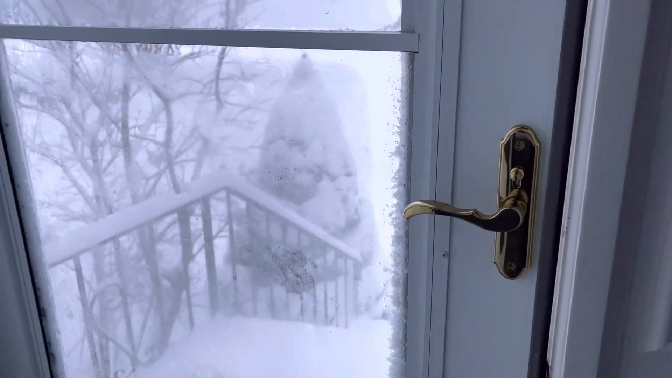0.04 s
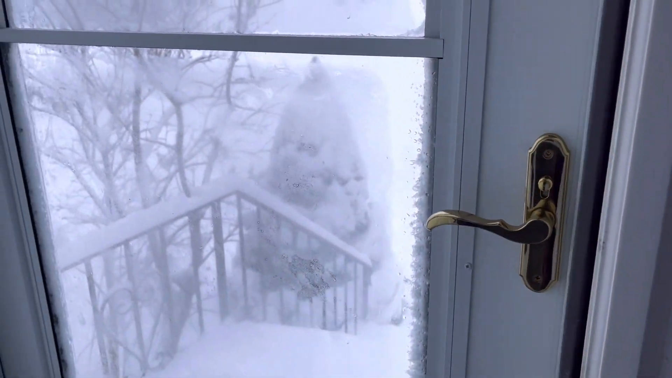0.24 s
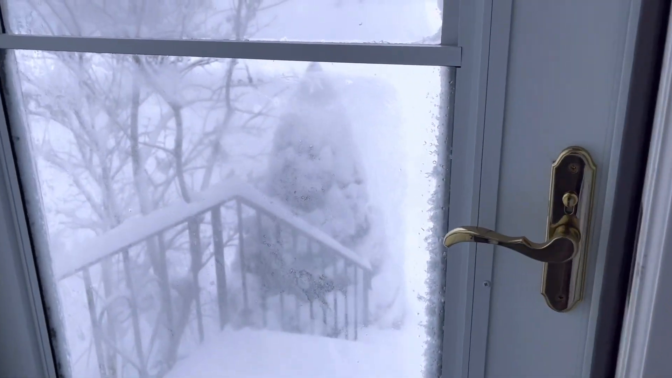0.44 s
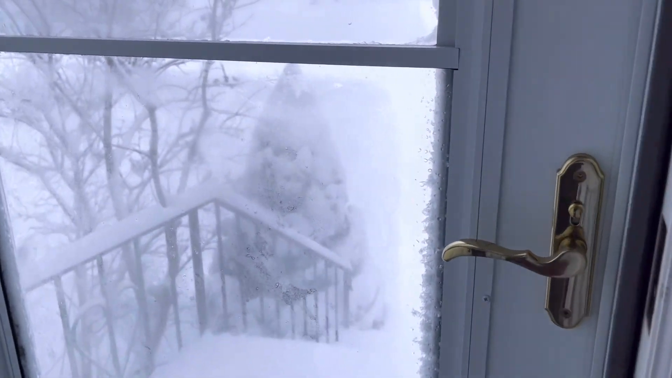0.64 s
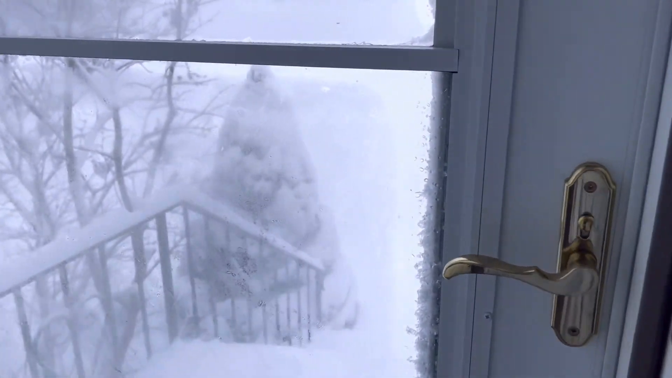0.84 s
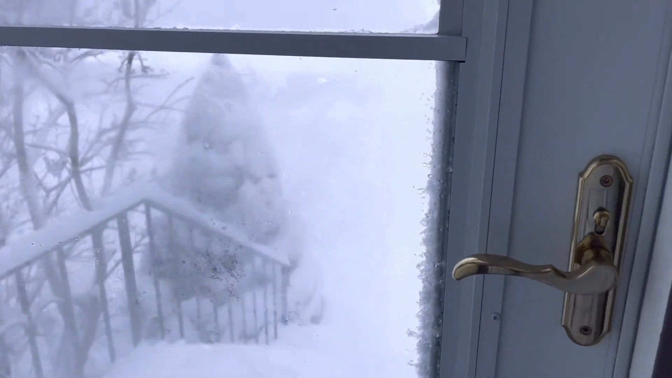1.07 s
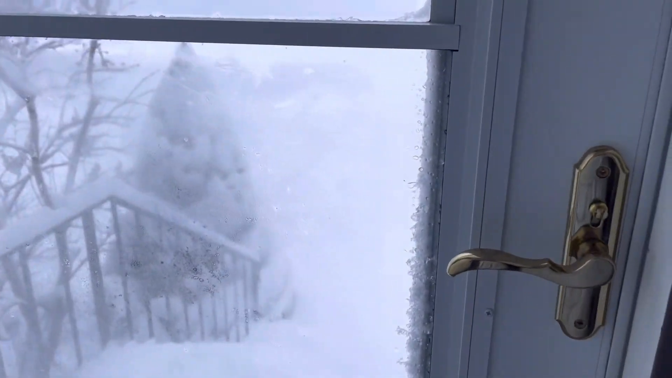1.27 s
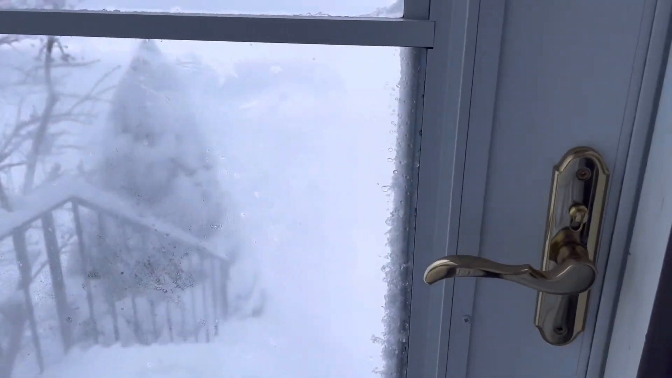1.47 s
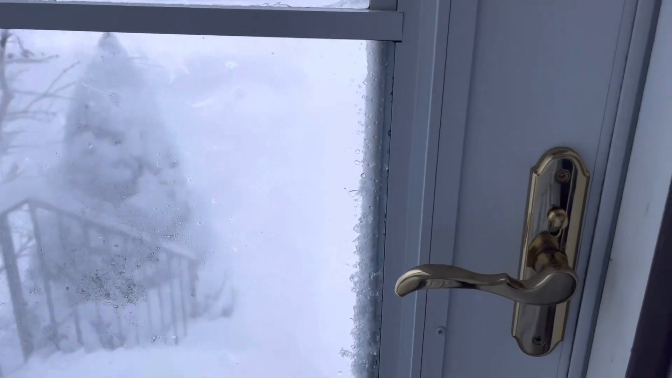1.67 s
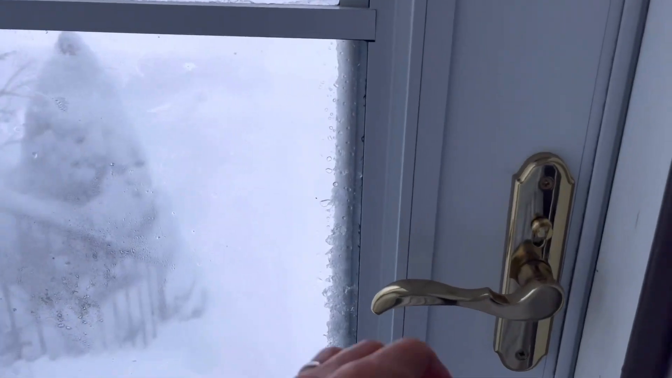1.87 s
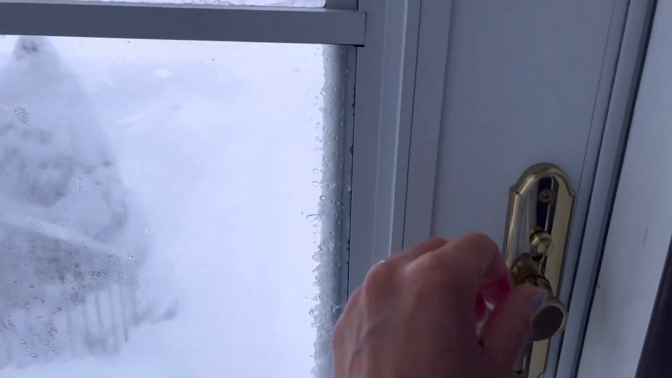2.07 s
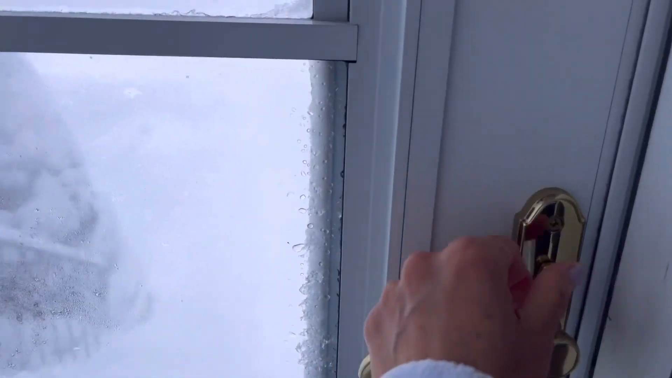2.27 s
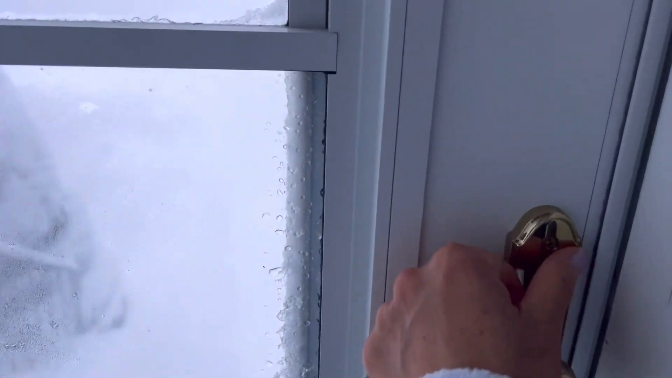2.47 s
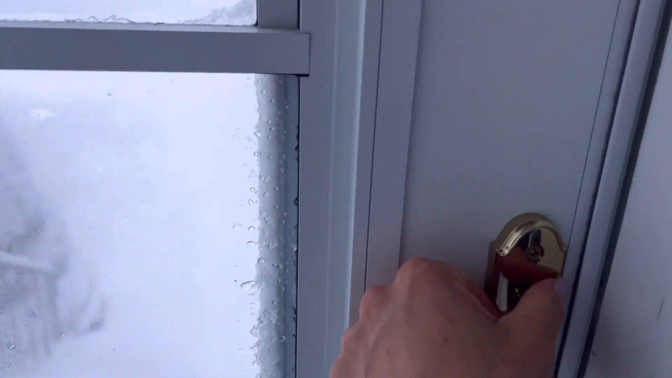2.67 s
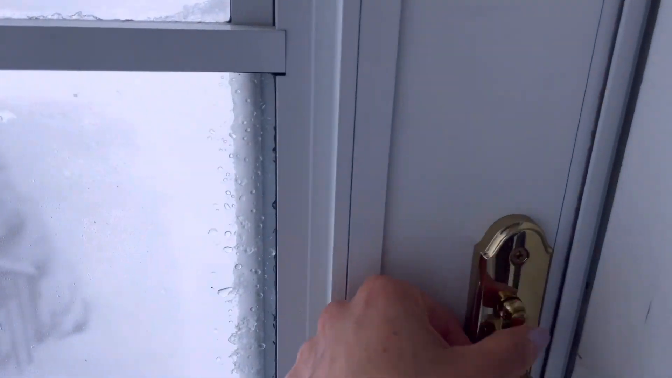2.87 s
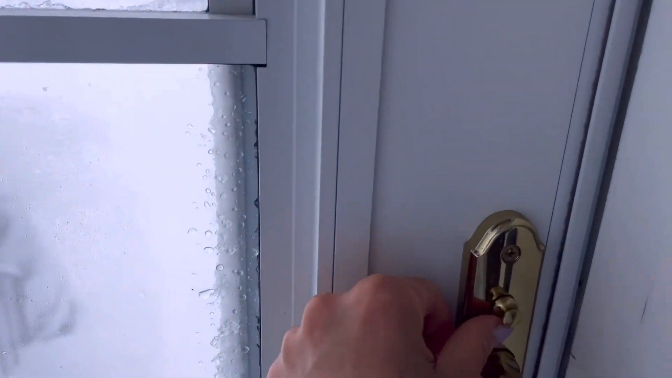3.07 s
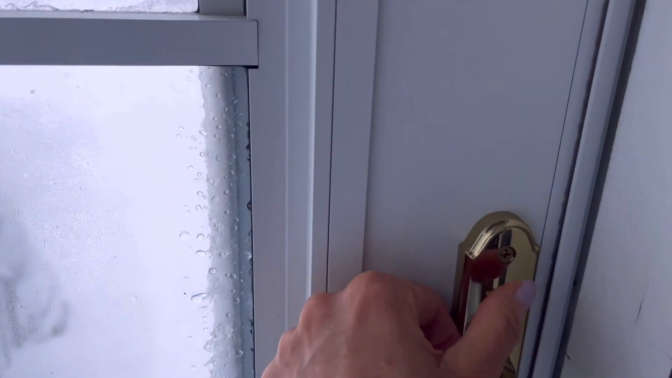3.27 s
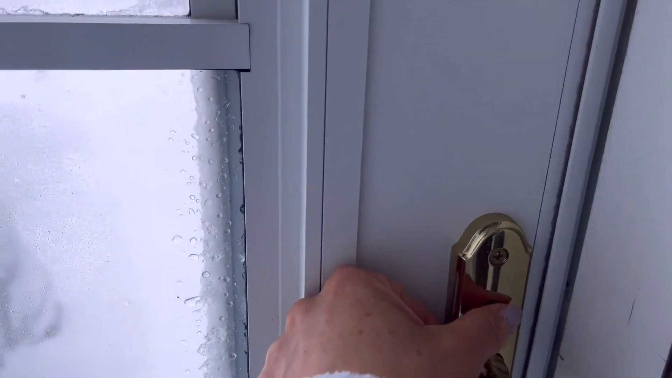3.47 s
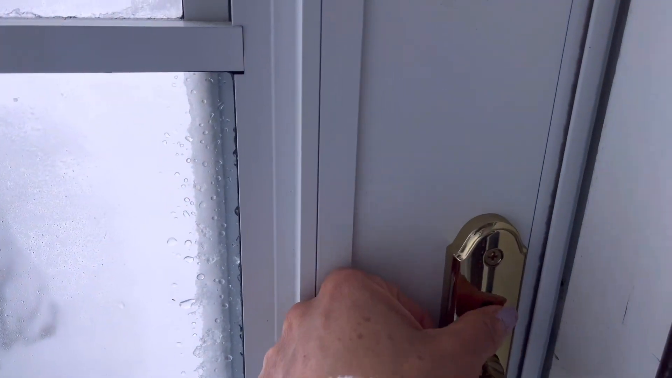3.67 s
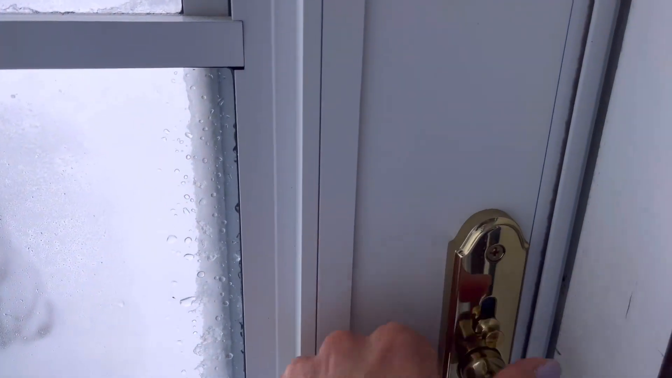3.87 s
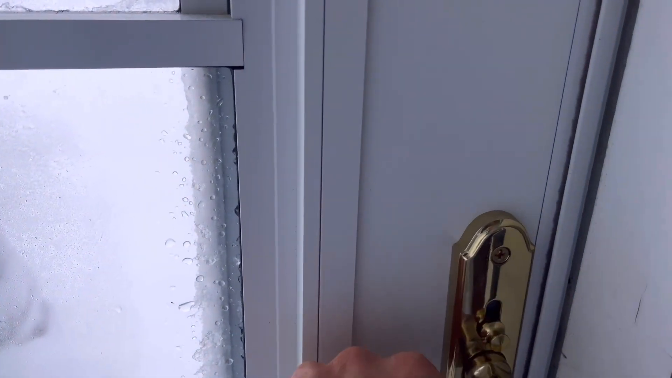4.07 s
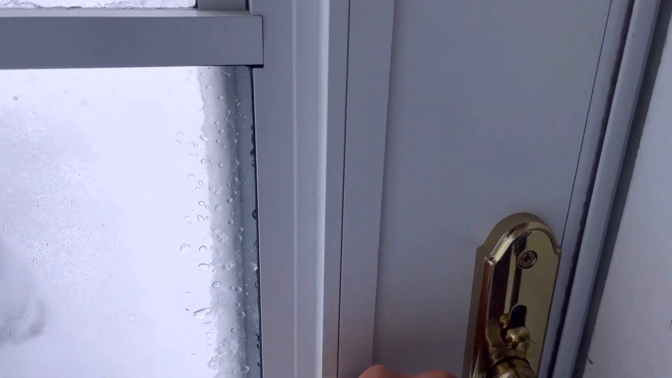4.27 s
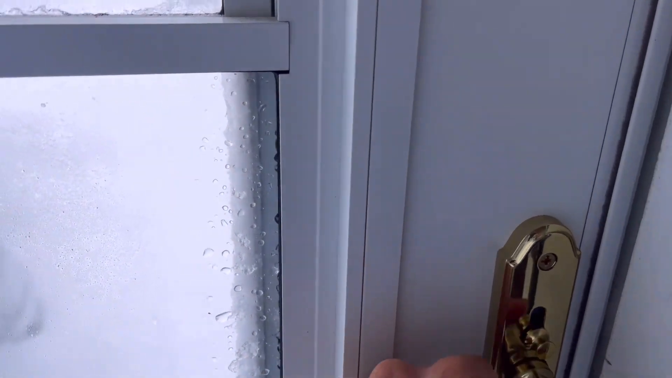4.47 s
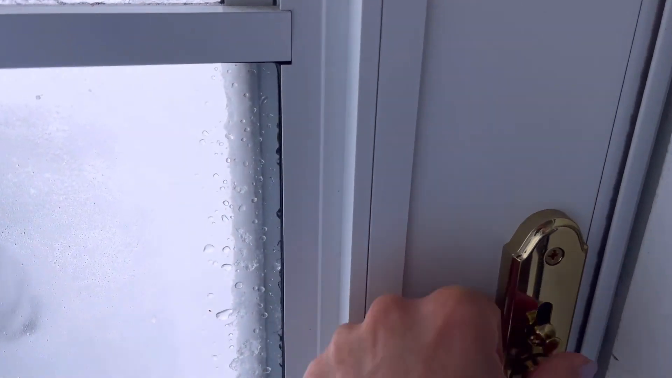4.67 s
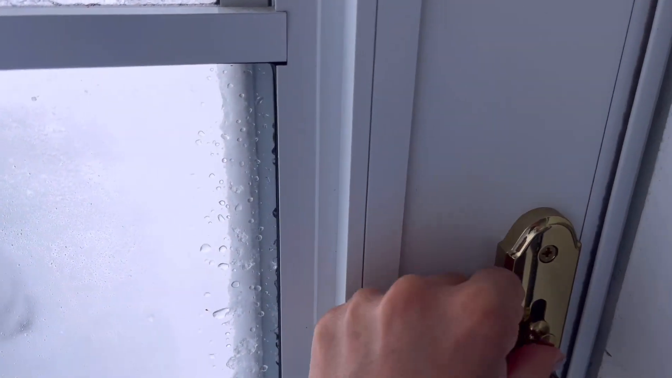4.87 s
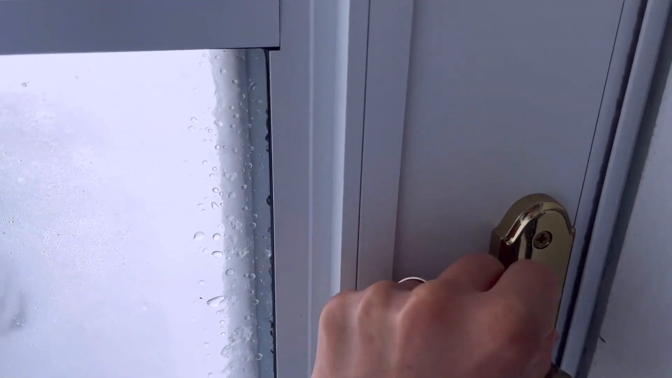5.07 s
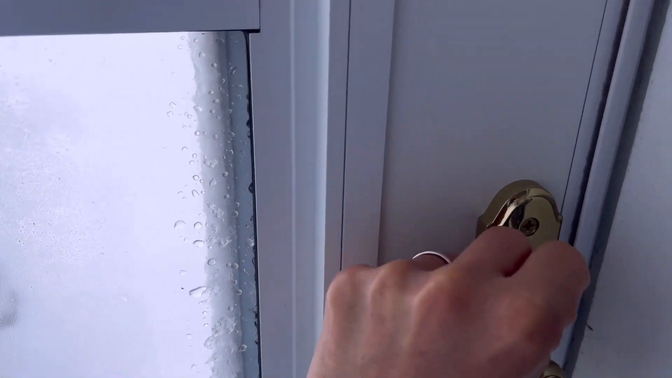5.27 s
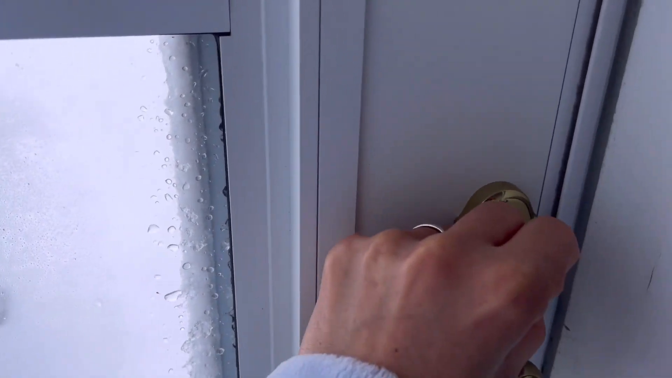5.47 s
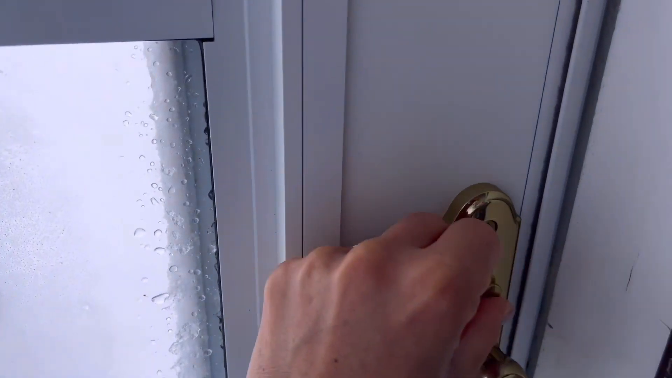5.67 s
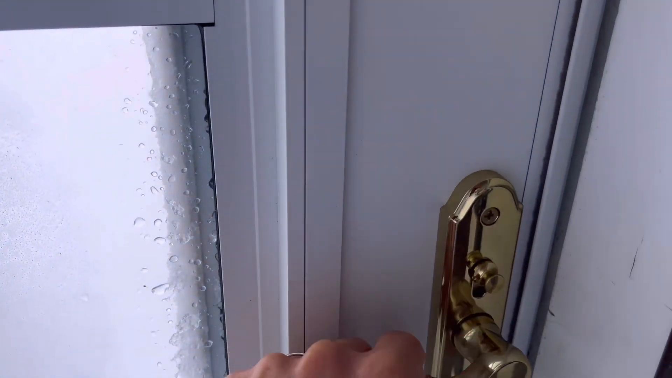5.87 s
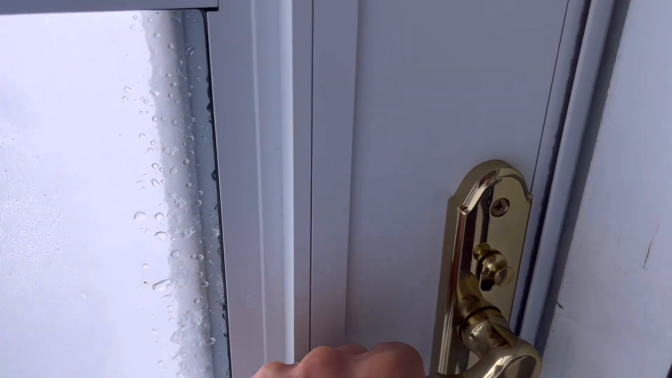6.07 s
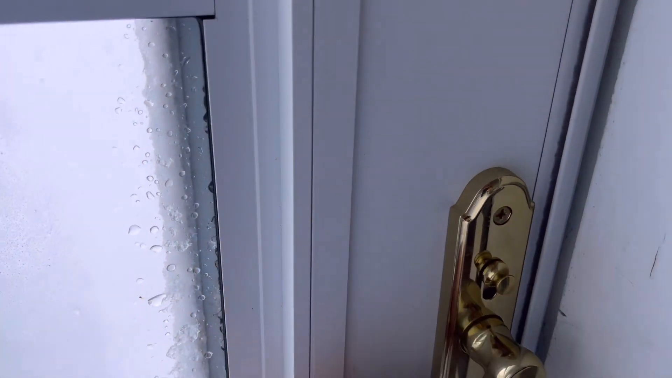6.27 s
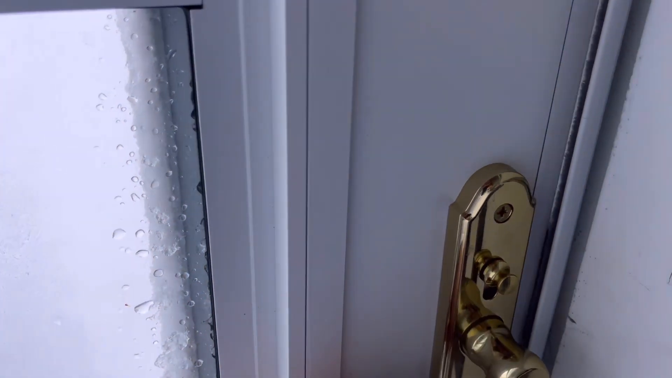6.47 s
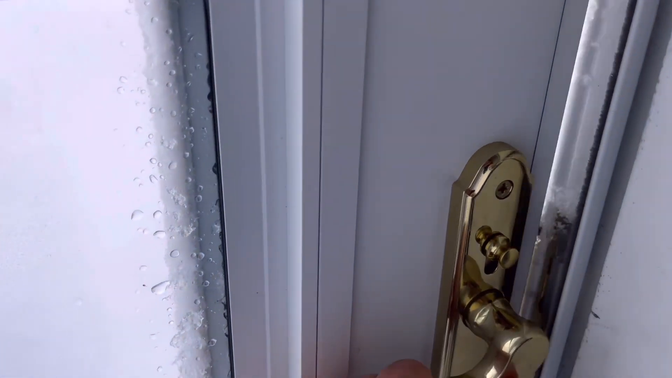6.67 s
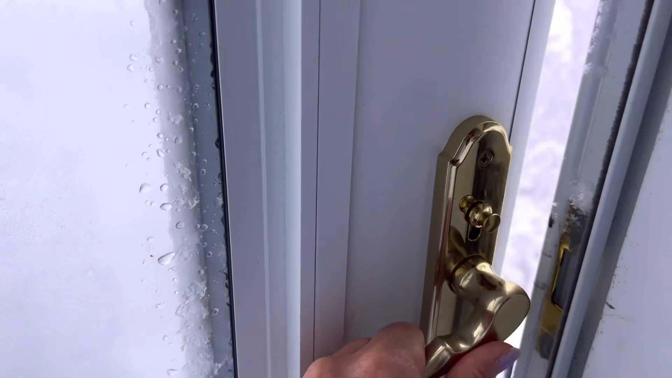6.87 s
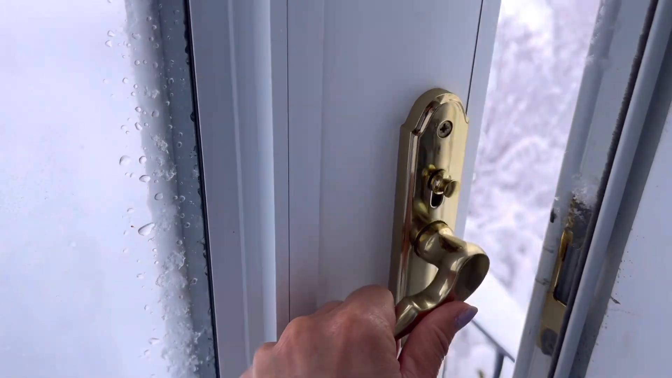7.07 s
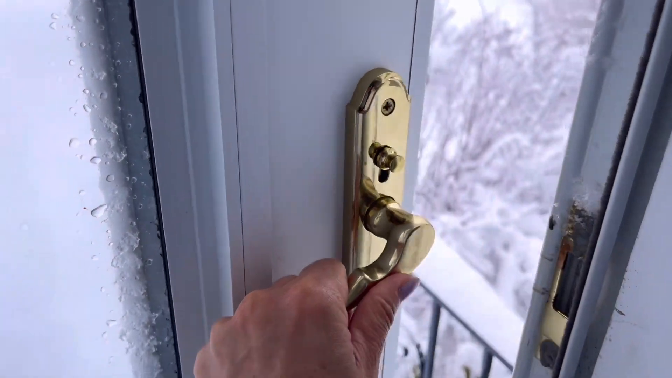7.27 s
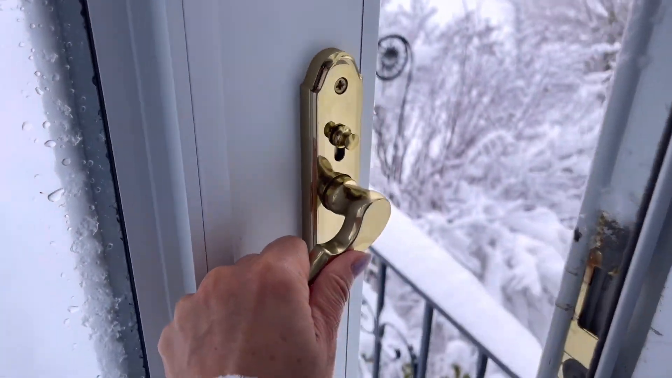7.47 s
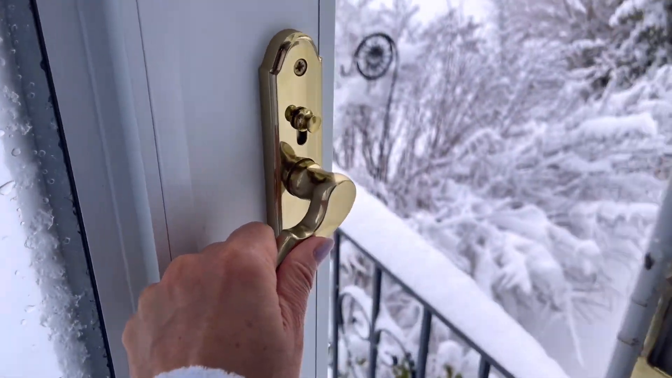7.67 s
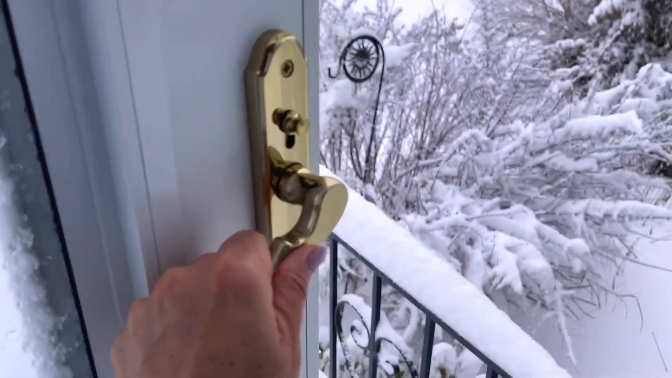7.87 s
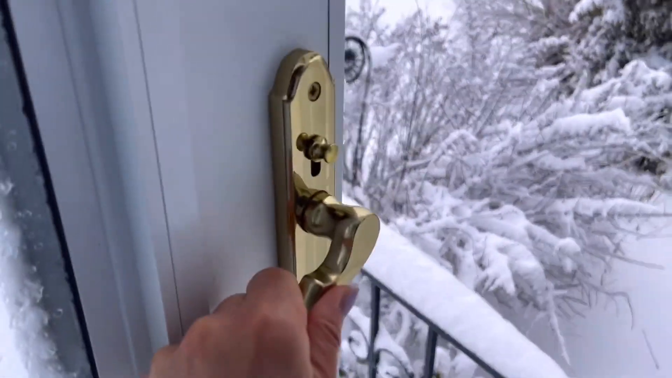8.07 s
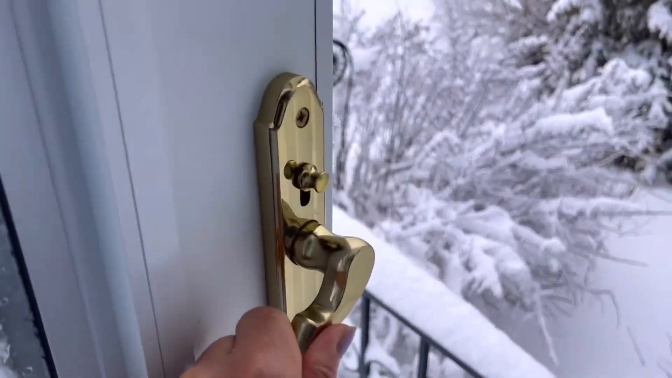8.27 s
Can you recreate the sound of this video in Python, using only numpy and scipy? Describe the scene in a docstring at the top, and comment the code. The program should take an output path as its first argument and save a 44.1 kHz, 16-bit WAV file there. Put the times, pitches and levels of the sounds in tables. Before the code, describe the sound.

Soft fabric rustle and light metal ticks begin, recorded very near the lock indoors. The bolt slams over twice about two seconds apart, with a thin faint squeak between. After a pause comes a short metallic grind, a dull heavy knock, a scrape and a thud as the door releases, then quiet hinge rubbing and light clicks. Low handling rumble and a short hallway echo surround it.

```python
"""In a hallway, close to the brass lock of a glazed metal storm door: a sleeve brushes by under a soft hiss.
The deadbolt snaps over twice, with small ticks of the thumb turn and one thin squeak between.
Then the lever grinds down, the latch knocks free, and the door scrapes off its frame and swings open.
Blows on lock and door are struck damped modes and noise; brushes, latch and frame are filtered tiny slips.
The microphone also takes in handling rumble, still air and the hallway's diffuse answer."""
import sys
import numpy as np
from scipy import signal
from scipy.fft import rfft, irfft, next_fast_len
from scipy.io import wavfile
from scipy.ndimage import uniform_filter1d, map_coordinates

SR = 44100
rng = np.random.default_rng(int(sys.argv[2]) if len(sys.argv) > 2 else 0)


def store_wav(level_fs):
    """Save 16-bit WAV to argv[1]."""
    pcm = np.round(np.clip(np.atleast_2d(level_fs), -1, 1) * 32767)
    wavfile.write(sys.argv[1], SR, pcm.T.astype(np.int16))


N = 367352
TIME = np.arange(N) / SR  # (s)
AGE = TIME[:SR // 2]  # time since a sound began (s)


def amp(db):
    """Decibels to gain."""
    return 10 ** (np.asarray(db) / 20)


def unit(x):
    """x at rms 1."""
    return x / np.sqrt(np.mean(x ** 2) + 1e-20)


def unit_blow(x, size=882):
    """A blow with the energy of size samples at rms 1."""
    return x / np.sqrt(np.sum(x ** 2) / size + 1e-20)


def along(points, hz):
    """Read (frequency_hz, value) points on a log frequency axis."""
    f, v = np.transpose(points)
    return np.interp(np.log(hz + 1), np.log(f + 1), v)


def level(rows):
    """Gain per sample from (time_s, level_db) rows, -120 dB outside them."""
    return amp(np.interp(TIME, *np.transpose(rows), left=-120, right=-120))


def wobble(rate):
    """A smooth random curve, rate knots a second."""
    knots = rng.standard_normal(int(N * rate / SR) + 4)
    return map_coordinates(knots, [TIME * rate])


def filtered(x, response):
    """x times a response of frequency."""
    m = next_fast_len(N + SR // 2)
    return irfft(rfft(x, m) * response(np.fft.rfftfreq(m, 1 / SR)), m)[:N]


def coloured(x, spectrum):
    """x through a (frequency_hz, level_db) spectrum, at rms 1."""
    return unit(filtered(x, lambda hz: amp(along(spectrum, hz))))


def slips(rate, spread_db):
    """Tiny impulses of uneven size at random moments, on average rate a second, at rms 1."""
    happens = rng.random(N) < rate / SR
    sign = rng.choice([-1, 1], N)
    size = amp(spread_db * np.minimum(rng.standard_normal(N), 2))
    return unit(happens * sign * size)


def add(track, s, sound):
    """Mix a sound into a track at time s."""
    start = max(round(s * SR), 0)
    track[start:start + len(sound)] += sound[:max(N - start, 0)]


def ringing(modes, scatter_db, length=1):
    """Damped modes, each struck at a new strength and sign."""
    hz, db, t60 = np.transpose(modes)[:, :, None]
    size = amp(db + scatter_db * rng.standard_normal(db.shape)) * rng.choice([-1, 1], db.shape)
    decay = np.exp(-np.log(1000) * AGE / (t60 * length))
    return np.sum(size * decay * np.sin(2 * np.pi * hz * AGE), axis=0)


def resonant(x, modes):
    """x through (frequency_hz, width_hz, level_db) resonances of alternating sign, at rms 1."""
    def response(f):
        total = 0
        for k, (centre, width, db) in enumerate(modes):
            damping = 1j * f * width
            total = total + (-1) ** k * amp(db) * damping / (centre ** 2 - f * f + damping)
        return total
    return unit(filtered(x, response))


def patchy(x, depth_db, size):
    """x with a colour that drifts from patch to patch; size = (bins, frames) of the smoothing."""
    z = signal.stft(x, nperseg=512)[2]
    field = rng.standard_normal(z.shape)
    for axis in (0, 1, 0, 1):
        field = uniform_filter1d(field, size[axis], axis)
    return signal.istft(z * amp(depth_db * unit(field)), nperseg=512)[1][:N]


# low modes of the door leaf: frequency_hz, relative level_db, full ring t60_s
LEAF_MODES = [(64, -10.5, 0.43), (75.5, -0.5, 0.34), (95.4, 3, 0.2), (120, -1, .28), (154.5, 1, .22),
              (183, -2, 0.28), (240, -4.5, 0.24), (299.5, -6.5, 0.21)]
# colour of the handling rumble: frequency_hz, relative level_db
RUMBLE_COLOUR = [(15, -50), (25, -24.5), (50, -1.5), (71, 6), (114, -6.5), (179, -6.5), (208, -10),
                 (288, -8.5), (327, -16), (500, -18.5), (650, -41.5), (1100, -120)]
# swell of the handling rumble before lumps and mix: time_s, level_db
HANDLING_SWELL = [(0.0, -66), (2.25, -62.5), (2.6, -62), (3.16, -53.5), (4.04, -67.5), (4.85, -55.5),
                  (5.75, -62.5), (6.15, -62), (6.31, -48.5), (6.61, -43), (7.03, -69), (7.63, -56.5),
                  (7.82, -46), (8.33, -67.5)]
# colour of the still air: frequency_hz, relative level_db
AIR_COLOUR = [(59, -30.5), (100, -6.5), (190, -3.5), (250, -18), (800, -30), (1800, -29), (3000, -34.5),
              (6000, -37), (8800, -42), (10900, -40), (16000, -50)]


def background():
    """Lumpy handling rumble, partly ringing in the door leaf, over the still air of the house."""
    # a mode's width follows from its ring
    widths = [(hz, np.log(1000) / (np.pi * t60), db) for hz, db, t60 in LEAF_MODES]
    leaf = resonant(rng.standard_normal(N), widths)
    rumble = amp(-3.5) * coloured(rng.standard_normal(N), RUMBLE_COLOUR) + amp(-5) * leaf
    lumps = amp(2.2 * wobble(14))
    air = amp(-66) * coloured(rng.standard_normal(N), AIR_COLOUR)
    return lumps * level(HANDLING_SWELL) * rumble + air


# short brushes of noise, some leading into a click: centre_s, level_db, half_width_s, bright_share (0-1)
BRUSH_STROKES = [(.06, -55.5, 0.0081, 0.27), (.96, -59.5, .024, 0.54), (1.071, -53, 0.018, 0.05),
                 (1.154, -49, .017, 0.14), (1.494, -45.5, 0.033, 0), (1.737, -48, 0.011, .01),
                 (1.844, -51, 0.018, 0), (2.05, -39.5, .026, 0.16), (2.17, -60.5, 0.053, 0),
                 (3.008, -54.5, .008, 0), (4.68, -65.5, 0.097, 0), (4.93, -68.5, 0.086, 0.2),
                 (5.029, -58, 0.0039, 0.34), (5.312, -54.5, 0.0054, 0.43), (6.934, -62.5, 0.028, 0.6),
                 (7.097, -51.5, 0.019, 0.21), (7.212, -48.5, 0.019, 0.04), (7.283, -42, 0.009, 0.35),
                 (8.15, -61, 0.0099, 0.13)]
# dull side of a brush: frequency_hz, relative level_db
DULL_COLOUR = [(88, 0), (150, -4.5), (348, -18.5), (524, -7.5), (662, -16), (790, -9), (1940, -9.5),
               (2450, -9.5), (5050, -13), (10600, -29.5), (16000, -45)]
# bright side of a brush: frequency_hz, relative level_db
BRIGHT_COLOUR = [(2000, -21), (6000, 9), (11000, 8), (16000, -9)]
# colour of the soft hiss: frequency_hz, relative level_db
HISS_COLOUR = [(120, -64), (200, -6), (283, -2), (322, -11.5), (360, -1.5), (387, -11.5), (448, 2.5),
               (538, -7), (709, 1), (933, -5), (2910, -6), (6280, -12), (16000, -41.5)]
# swell of the soft hiss of the opening seconds, before HISS_GAIN_DB: time_s, level_db
HISS_SWELL = [(0.0, -62), (0.16, -58.5), (0.36, -63.5), (1.05, -61.5), (1.26, -66), (1.49, -71),
              (1.61, -58), (1.99, -61.5), (2.53, -69.5), (2.79, -67), (2.91, -64), (3.45, -68)]
HISS_GAIN_DB = 1.5


def brushes_and_hiss():
    """Dense tiny slips swell into short brushes, over a soft noise hiss; the colour of both shifts."""
    dull = coloured(slips(rate=5000, spread_db=3), DULL_COLOUR)
    brightest = coloured(slips(rate=3900, spread_db=3), BRIGHT_COLOUR)
    brushes = np.zeros(N)
    for s, db, width, bright in BRUSH_STROKES:
        stroke = np.exp(-.5 * ((TIME - s) / width) ** 2)
        brushes += amp(db) * stroke * ((1 - bright) * dull + bright * brightest)
    hiss = level(HISS_SWELL) * coloured(rng.standard_normal(N), HISS_COLOUR)
    unsteady = amp(HISS_GAIN_DB + .6 * wobble(14)) * hiss
    return patchy(brushes + unsteady, depth_db=2, size=(11, 23))


# brief squeaks: start_s, level_db, swell_s, start_hz, end_hz, roughness_hz
SQUEAK_GLIDES = [(.002, -51, 0.0075, 1244, 1250, 40), (0.046, -52, 0.008, 1220, 1265, 50),
                 (0.049, -53, 0.0091, 2470, 2450, 40), (3.402, -64, 0.0076, 9500, 9600, 80),
                 (4.086, -56, 0.0066, 6090, 7980, 396), (6.289, -38, 0.004, 1940, 2170, 59),
                 (7.869, -32, 0.0028, 6220, 6150, 504)]


def squeaks():
    """Thin, unsteady tones that glide quickly and settle."""
    out = np.zeros(N)
    for s, db, swell_s, start_hz, end_hz, rough_hz in SQUEAK_GLIDES:
        glide = (end_hz - start_hz) * np.tanh(AGE / 0.022)
        pitch = start_hz + glide + rough_hz * wobble(700)[:len(AGE)]
        swell = AGE / swell_s * np.exp(1 - AGE / swell_s)  # peaks swell_s after the start
        add(out, s, amp(db) * swell * np.sin(2 * np.pi * np.cumsum(pitch) / SR))
    return out


# ranges in which the lock rings: low_hz, high_hz
RING_RANGES = [(250, 720), (820, 1400), (1400, 2600), (2600, 5500), (5500, 9500), (9500, 14500)]
# full ring of each range, high ranges die first: t60_s
RING_T60 = [0.1, .075, 0.086, 0.081, 0.056, .032]
# modes of the brass lock case: frequency_hz, relative level_db, full ring t60_s
CASE_MODES = [(377, -3, .14), (494, -2, .15), (650, -5, .1), (970, -1, .11), (1065, -1, .1),
              (1270, -2, .09), (1420, -3, .07), (1625, -2, .08), (1930, -4, .07), (2256, -3, .06),
              (2480, -3, .06), (2880, -2, .055), (3020, -3, .05), (3230, -2, .05), (3570, 0, .055),
              (3740, 1, .055), (3900, -1, .055), (4280, -3, .05), (4465, -4, .05), (5025, -4, .05),
              (5600, -6, .04), (7400, -4, .035), (8540, -3, .035), (10400, -3, .03), (12800, -6, .03)]


def contact(range_db, length, modes_db, crack_db, crack_s, rise):
    """Metal on metal: a crack, the dense ring of small parts and the case's modes."""
    seating = 1 - np.exp(-(AGE / rise) ** 4)  # the faces take a moment to meet fully
    case = seating * ringing(CASE_MODES, scatter_db=2.5, length=length)
    crack = amp(crack_db) * np.exp(-np.abs(AGE - rise) / crack_s)
    blow = np.zeros(len(AGE))
    for edges, t60, db in zip(RING_RANGES, RING_T60, range_db):
        band = signal.butter(4, edges, "bandpass", fs=SR, output="sos")
        fade = seating * (np.exp(-np.log(1000) * AGE / (t60 * length)) + crack)
        parts = unit_blow(signal.sosfilt(band, fade * rng.standard_normal(len(AGE))))
        modes = unit_blow(signal.sosfilt(band, case))
        blow += amp(db) * unit_blow(parts + amp(modes_db) * modes)
    return blow


# colour of an even, instant tap: relative level_db in each ringing range
EVEN_TAP_COLOUR = [0.16, -0.96, 1.65, 0, -4, 4]
ROLL_OFF_DB = 17.5  # fall per octave above 1 / contact time


def tap_colour(tilt, contact_ms):
    """Share of a tap's energy in each ringing range (dB): it tilts up to 1 / contact time and falls beyond."""
    centres_hz = np.sqrt(np.prod(RING_RANGES, axis=1))
    octaves = np.log2(centres_hz * contact_ms / 1000 + 1e-6)  # from 1 / contact time
    slope = tilt * np.minimum(octaves, 0) - ROLL_OFF_DB * np.maximum(octaves, 0)
    gain = amp(np.array(EVEN_TAP_COLOUR) + slope)
    return 20 * np.log10(gain / np.linalg.norm(gain))


DAMPING_PER_MS = 1.2  # a long contact damps the ring


def tap(tilt, contact_ms):
    """A light contact in the lock; the longer the parts touch, the shorter it rings."""
    length = 1 / (1 + DAMPING_PER_MS * contact_ms)  # share of the full ring
    return contact(tap_colour(tilt, contact_ms), length, modes_db=-6, crack_db=-3, crack_s=.001, rise=.002)


# light contacts of thumb turn, lever and latch; small parts tilt upward, a long contact is dull:
# start_s, level_db, tilt_db_per_octave, contact_ms
LOCK_CLICKS = [(1.14, -49, 1.5, 0.15), (2.37, -57, -4.5, 0.069), (2.753, -56.5, 2.5, 0.46),
               (2.799, -47.0, 2.5, 0.17), (3.013, -45, 4.5, 0.29), (3.062, -58.0, 2.5, 0.34),
               (3.128, -56.0, -0.5, 0.3), (3.336, -50, 13, 0.47), (3.407, -54.0, 1.5, 0.37),
               (3.784, -59.5, 0, 0.26), (4.274, -50, 22.0, 0.69), (4.489, -59.5, 2, 0.21),
               (4.819, -45, 3, 0.09), (5.031, -44.5, 2, 0.32), (5.241, -53, -8, 0.1),
               (5.583, -46, 23, 0.69), (5.658, -55, -0.5, 0.77), (5.753, -54.5, 4, 0.15),
               (5.768, -34.5, 5, 0.28), (5.9, -51, 6.5, 0.2), (6.102, -52.5, -4.5, 0.41),
               (6.301, -24.5, -4, 0.19), (6.362, -38, 3.5, 0.15), (6.383, -36.0, 2.5, 0.19),
               (6.49, -37.5, 10, 0.7), (6.556, -29, 16, 0.44), (6.59, -38, -0.5, 0.2),
               (6.665, -41.5, 0.0, 0.19), (6.726, -53, 17, 0.13), (6.88, -46.5, 15, 0.35),
               (6.904, -38.5, 6.5, 0.1), (7.187, -43.5, -1, 0.16), (7.223, -44, -1, 0.17),
               (7.279, -35.5, -3, 0.15), (7.626, -47.5, 11, 0.84), (7.801, -53, 1.5, 0.14),
               (7.867, -34, -1.5, 0.13), (8.286, -50, 1.5, 0.67)]
# pings of the lock's small spring: start_s, level_db
SPRING_PINGS = [(2.801, -63), (5.334, -49), (5.899, -43.5)]
# modes of that spring: frequency_hz, relative level_db, t60_s
SPRING_MODES = [(2228, -1, 0.021), (4270, -5, 0.043), (7630, -3, 0.029), (11380, 0, 0.051),
                (11200, -2, 0.049), (13840, -10, .04)]


def clicks():
    """Play in the thumb turn, lever and latch is taken up in light taps; now and then the spring pings."""
    out = np.zeros(N)
    for s, db, tilt, contact_ms in LOCK_CLICKS:
        add(out, s, amp(db) * tap(tilt, contact_ms))
    for s, db in SPRING_PINGS:
        add(out, s, amp(db) * unit_blow(ringing(SPRING_MODES, scatter_db=0.5)))
    return out


def thud(tilt):
    """One push on the door leaf, ringing its low modes for a share of their full length."""
    modes = [(hz, mode_db + tilt * np.log2(hz), t60) for hz, mode_db, t60 in LEAF_MODES]
    onset = 1 - np.exp(-AGE / 0.01)
    return unit_blow(ringing(modes, scatter_db=3, length=0.69) * onset)


# thuds of the door leaf; a hard, small contact tilts upward: start_s, level_db, tilt_db_per_octave
LEAF_THUDS = [(2.381, -48.5, 0), (2.68, -57, 8), (3.021, -49, 8), (3.141, -53.5, 6), (3.24, -50, -1),
              (3.482, -30.5, 1.5), (3.551, -40, -1.5), (4.043, -43, 4), (4.442, -48, 1), (5.035, -52, 3),
              (5.942, -49, -2), (6.109, -41.5, -4.5), (6.203, -33.5, -4.5), (6.31, -27, -4),
              (6.62, -26, 3.5), (6.682, -33.5, -2.5), (6.741, -38.5, -5), (6.914, -45.5, -2),
              (7.283, -39.5, 3.5), (7.574, -44.5, -15), (7.78, -47, 5), (7.877, -38, 36),
              (7.935, -39.5, -10)]


def thuds():
    """Heavier blows and pushes shake the whole door leaf."""
    out = np.zeros(N)
    for s, db, tilt in LEAF_THUDS:
        add(out, s, amp(db) * thud(tilt))
    return out


# the bolt catches on its spring just before each throw: start_s, level_db, tilt_db_per_octave, contact_ms
BOLT_CATCHES = [(3.4664, -36.5, 9, .24), (3.471, -29, 3, .17), (3.4752, -25.5, 7.5, .9),
                (3.4756, -35, 0, 0.14), (3.486, -27.5, 3, .9), (5.3167, -41.5, 9, 0.63),
                (5.3207, -20.5, 4, .06)]
# the bolt slams against its stop: start_s, level_db, tilt_db_per_octave
BOLT_SLAMS = [(3.5104, -13.5, -0.1), (5.332, -16.5, 0.1)]
# colour of a slam before its tilt: level_db in each ringing range
BOLT_SLAM_COLOUR = [-16.5, -15.5, -9, -2, -9, -17]
SLAM_LENGTH, SLAM_MODES_DB = .7, -7.5  # share of the full ring; the case's modes over the ring of small parts
SLAM_THUD_DB, SLAM_THUD_TILT_DB = -19, 4  # shake of the leaf: relative to the slam's level_db; dB per octave


def deadbolt():
    """The bolt drags over its spring, then slams against its stop and shakes the door."""
    out = np.zeros(N)
    snap = dict(crack_db=0, crack_s=.0015, rise=.0003)
    for s, db, tilt, contact_ms in BOLT_CATCHES:
        catch = contact(tap_colour(tilt, contact_ms), length=.75, modes_db=-6, **snap)
        add(out, s, amp(db) * catch)
    octaves = np.log2(np.prod(RING_RANGES, axis=1)) / 2  # range centres
    for s, db, tilt in BOLT_SLAMS:
        colour = BOLT_SLAM_COLOUR + tilt * (octaves - octaves.mean())
        add(out, s, amp(db) * contact(colour, SLAM_LENGTH, SLAM_MODES_DB, **snap))
        add(out, s, amp(db + SLAM_THUD_DB) * thud(SLAM_THUD_TILT_DB))
    return out


# a rub bites fast, eases as the parts slide, then lets go
RUB_ATTACK_DB_PER_S, RUB_SAG_DB_PER_S, RUB_RELEASE_DB_PER_S = 1304, 55, 750


def pressure(rubs):
    """Gain per sample of rubs that bite, sag and let go."""
    total = np.zeros(N)
    for s, length, db in rubs:
        bite = RUB_ATTACK_DB_PER_S * np.maximum(s - TIME, 0)
        sag = RUB_SAG_DB_PER_S * np.clip(TIME - s, 0, length)
        release = RUB_RELEASE_DB_PER_S * np.maximum(TIME - s - length, 0)
        total += amp(db - bite - sag - release)
    return total


# resonances of the strike plate: frequency_hz, width_hz, relative level_db
STRIKE_MODES = [(1247, 28, 7), (1730, 51, 3.5), (1798, 49, 1), (1925, 153, 1), (2080, 170, -6.5),
                (2730, 150, -6.5), (3370, 200, -17), (3670, 120, -7)]


def grind(rubs, spectrum, scrape_db, plate_db):
    """Metal sticks and slips in uneven clumps and rings the strike plate as the point of contact shifts."""
    clumps = amp(1.4 * wobble(110))
    friction = slips(rate=1500, spread_db=4.5) * pressure(rubs) * clumps
    plate = amp(plate_db) * resonant(friction, STRIKE_MODES)
    scrape = plate + amp(scrape_db) * coloured(friction, spectrum)
    return np.std(friction) * patchy(scrape, depth_db=3, size=(5, 5))  # rms 1 back to the friction's level


# rubs of the latch drawn back by the lever: start_s, length_s, friction level_db
LATCH_STROKES = [(6.19, 0.113, -33.5)]
# colour of the latch scrape: frequency_hz, relative level_db
LATCH_COLOUR = [(120, -39.5), (200, -9), (387, -14.5), (456, -19), (491, -12), (749, -14.5), (899, -18.5),
                (1230, -3.5), (1400, -16.5), (1810, 2.5), (3250, -35), (4120, -18.5), (16000, -45)]


def latch():
    """The lever draws the latch back, grinding metal on metal."""
    return grind(LATCH_STROKES, LATCH_COLOUR, scrape_db=-2, plate_db=-4)


# rubs of the door edge on its frame: start_s, length_s, friction level_db
FRAME_STROKES = [(6.395, 0.044, -44), (6.51, 0.039, -47), (6.558, 0.12, -32.5)]
# colour of the door edge: frequency_hz, relative level_db
EDGE_COLOUR = [(120, -40), (200, -12), (278, -1), (373, -13), (465, -3), (538, -14), (749, -14.5),
               (867, -23), (1230, -8.5), (1450, -7.5), (2170, -10.5), (6880, -31), (16000, -33.5)]


def frame():
    """The door edge sticks and slips as it scrapes off its frame."""
    return grind(FRAME_STROKES, EDGE_COLOUR, scrape_db=-3.5, plate_db=-1.5)


# swell of the door swinging out, before its unsteady gain: time_s, level_db
SWING_SWELL = [(6.72, -66), (6.848, -52.5), (7.208, -63.5), (7.31, -75.5), (7.578, -55.5), (7.758, -51),
               (7.838, -53.5), (8.044, -62), (8.33, -62)]
# colour of the swing: frequency_hz, relative level_db
SWING_COLOUR = [(120, -25), (200, 3.5), (245, 4.5), (401, -1), (916, -6.5), (1100, -13.5), (1420, -5),
                (2510, -12.5), (3310, -13.5), (5730, -26.5), (16000, -43)]


def swing():
    """The opening door rubs softly on its hinges and closer, in many tiny slips."""
    rub = coloured(slips(rate=1500, spread_db=-0.5), SWING_COLOUR)
    return amp(-1 + 1.1 * wobble(30)) * level(SWING_SWELL) * rub


RATTLE_START_S, RATTLE_END_S = 7.6, 8.1
RATTLE_LOW_DB, RATTLE_HIGH_DB = -63.5, -60.5


def rattle(count):
    """Faint taps of the loose lever at random moments of the swing."""
    out = np.zeros(N)
    for _ in range(count):
        s = rng.uniform(RATTLE_START_S, RATTLE_END_S)
        db = rng.uniform(RATTLE_LOW_DB, RATTLE_HIGH_DB)
        add(out, s, amp(db) * tap(tilt=0.49, contact_ms=.16))
    return out


# how long the hallway lingers: frequency_hz, t60_s
ROOM_T60 = [(100, 0.55), (400, 0.17), (1200, .46), (2500, .45), (4500, .44), (8000, 0.21), (11000, 0.15),
            (14000, .17)]
# how strongly it answers: frequency_hz, gain_db
ROOM_GAIN = [(60, -15), (150, -7.5), (400, -9.5), (1200, -17), (4000, -18), (8000, -17.5), (12000, -17.5)]


def room(x):
    """The hallway's diffuse answer: the energy in each band lingers and dies at its own speed."""
    hz, t, z = signal.stft(x, SR, nperseg=256)
    t, t60 = t[t < 1], along(ROOM_T60, hz)[:, None]
    build_up = 1 - np.exp(-t / 0.0033)
    decay = (np.exp(-np.log(1000) * t / t60) * build_up) ** 2
    decay /= decay.sum(axis=1, keepdims=True)
    energy = signal.fftconvolve(np.abs(z) ** 2, decay, axes=1)[:, :z.shape[1]]
    echoes = signal.stft(rng.standard_normal(N), SR, nperseg=256)[2]
    lingering = np.sqrt(np.abs(energy)) * echoes / np.std(echoes)
    tail = signal.istft(lingering, SR, nperseg=256)[1][:N]
    return filtered(tail, lambda f: amp(along(ROOM_GAIN, f)))


def scene():
    """The lock is close by; the squeaks carry more of the room."""
    still, soft, thin = background(), brushes_and_hiss(), squeaks()
    lock = clicks() + deadbolt() + latch() + rattle(count=7)
    door = soft + lock + thuds() + frame() + swing()
    return (door + thin + room(door + amp(1.5) * thin) + still)[None]


TOP_HZ = 16000  # the sound ends steeply here


def record(dry):
    """The deep bass is thinned, the highest peaks are rounded off and the sound ends steeply at TOP_HZ."""
    high_pass = signal.butter(N=3, Wn=46, btype="highpass", fs=SR, output="sos")
    lean = signal.sosfilt(high_pass, dry[0])
    rounded = lean / (1 + np.abs(lean / 1.1) ** 6) ** (1 / 6)
    return filtered(rounded, lambda hz: 1 / (1 + (hz / TOP_HZ) ** 90))[None]


dry = scene()
out = record(dry)
store_wav(out)
```